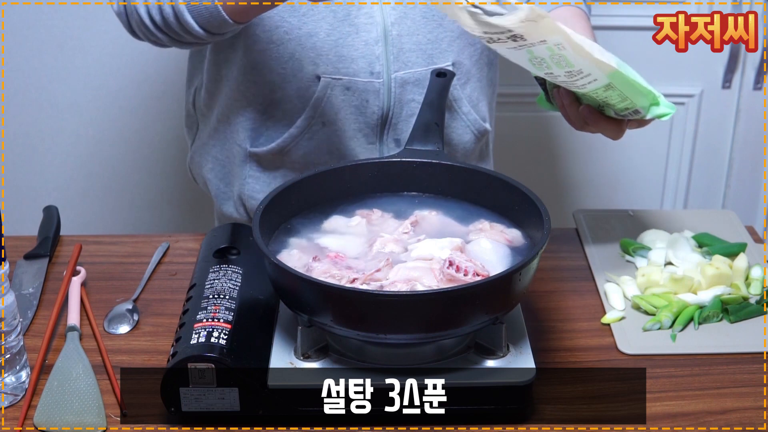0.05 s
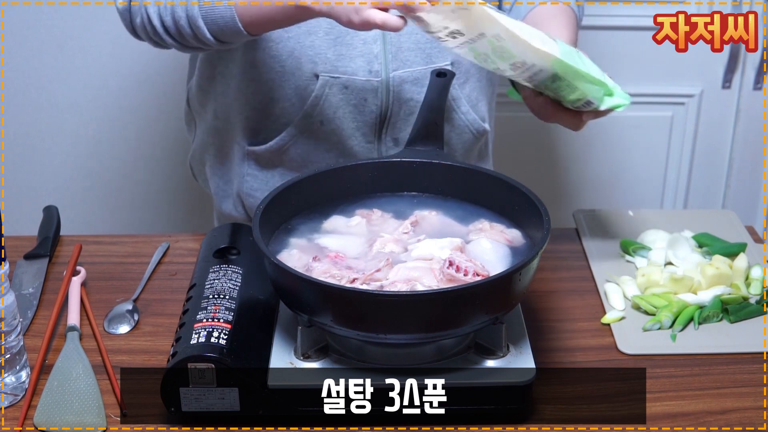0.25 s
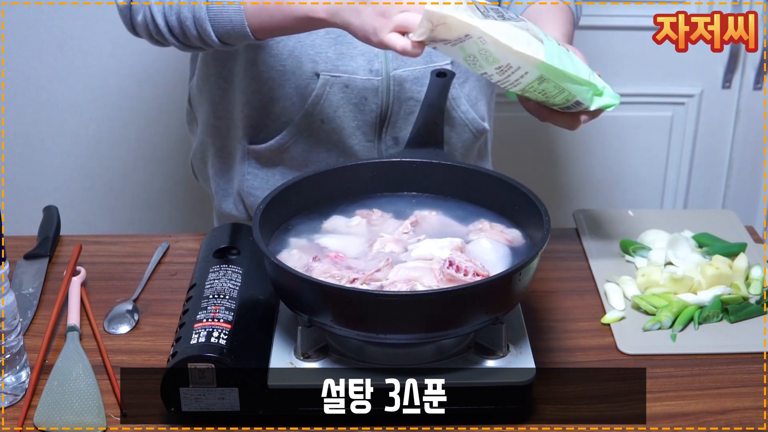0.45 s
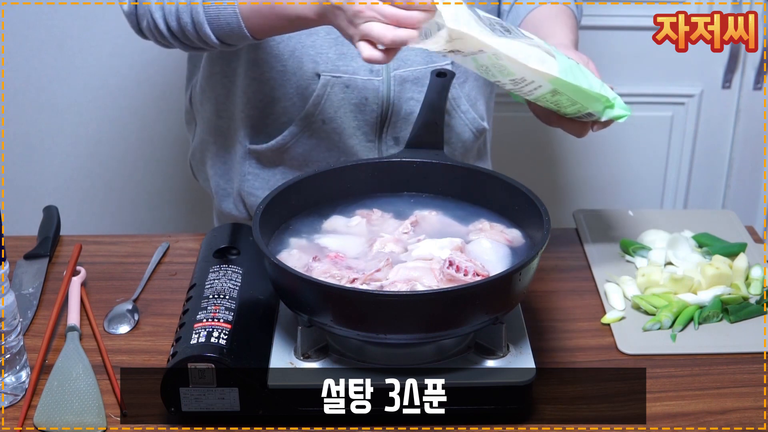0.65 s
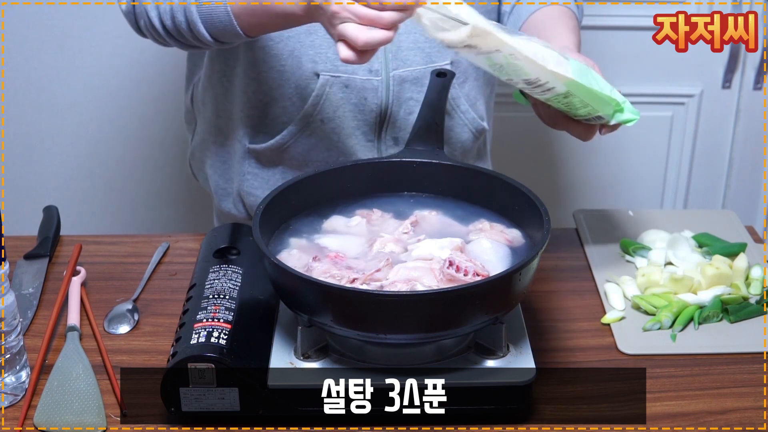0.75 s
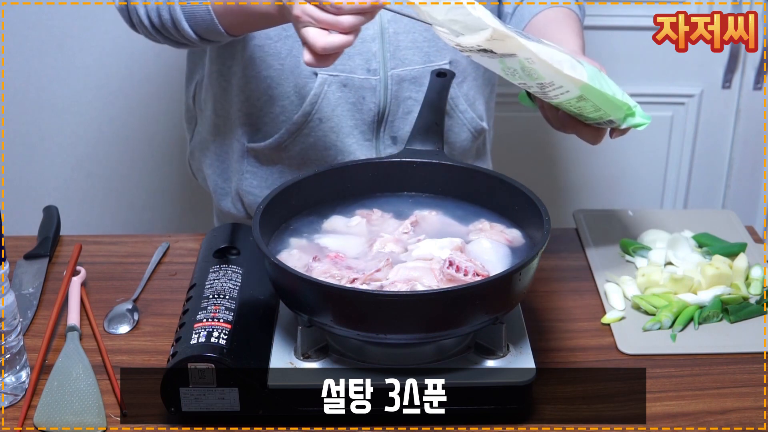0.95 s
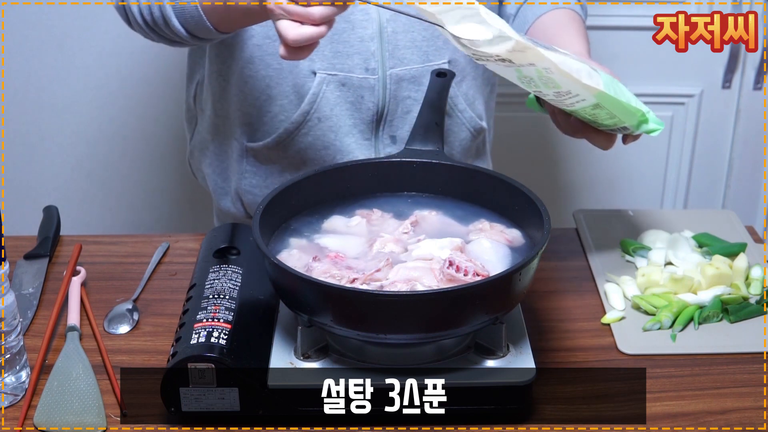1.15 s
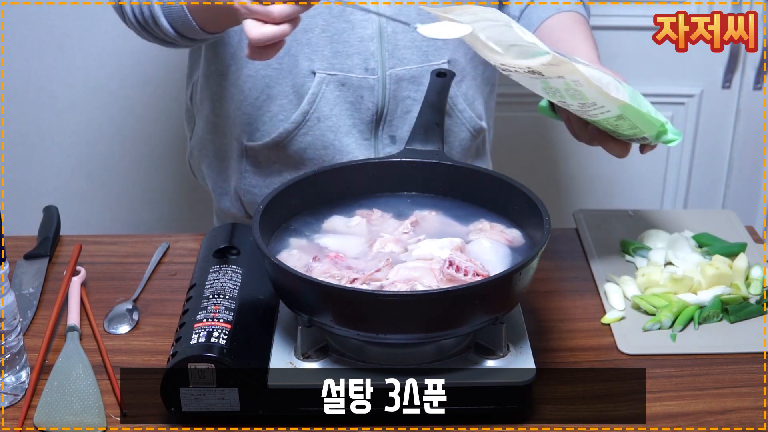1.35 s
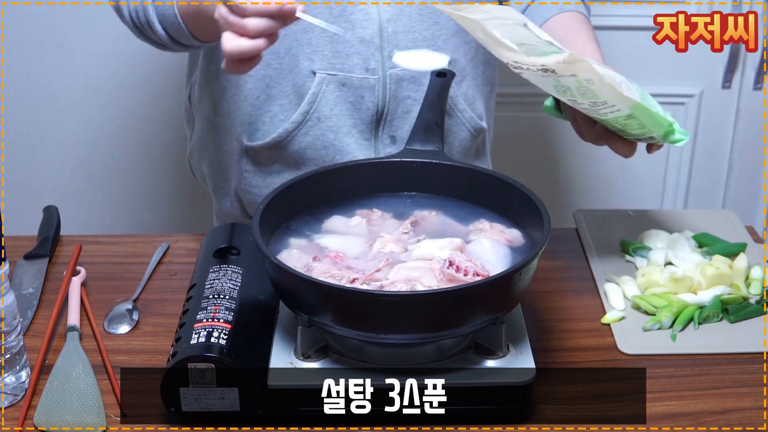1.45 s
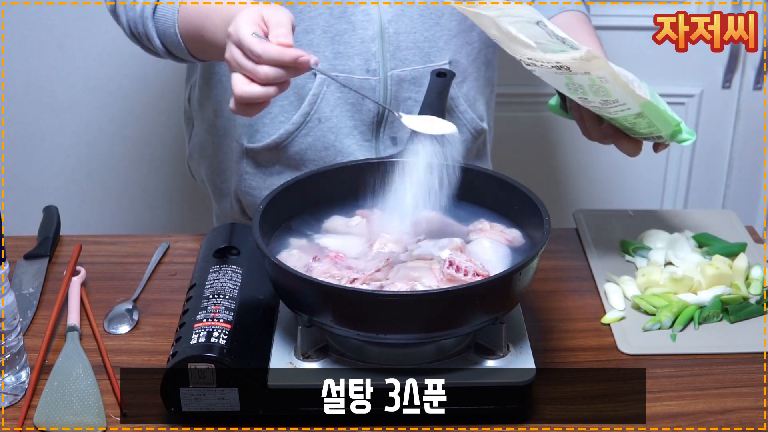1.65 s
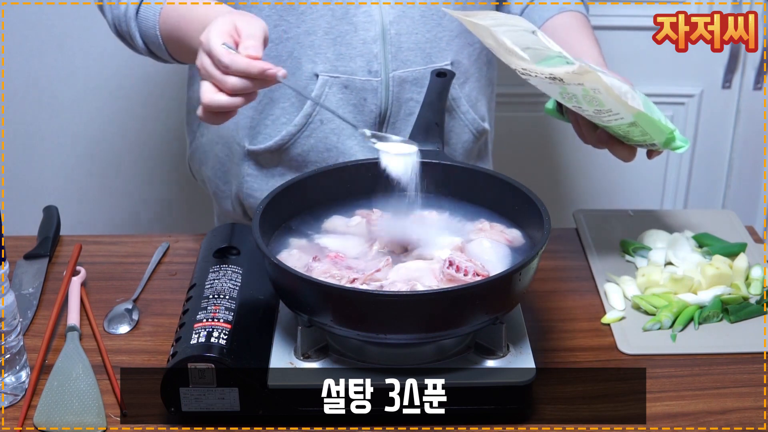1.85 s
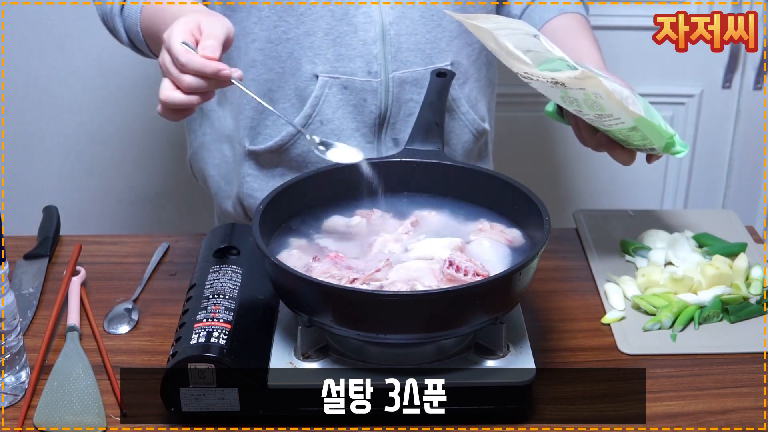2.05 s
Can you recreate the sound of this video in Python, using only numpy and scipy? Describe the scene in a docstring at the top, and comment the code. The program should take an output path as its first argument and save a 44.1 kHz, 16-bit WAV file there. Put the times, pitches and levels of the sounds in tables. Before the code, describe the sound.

A metal spoon scoops crunching sugar from a crinkling plastic bag in a small kitchen.

```python
"""A metal spoon digs into a plastic bag of sugar in a small kitchen.
The stiff film buckles with dull pops and its creases snap. The crystals hiss and crunch in many
tiny slips as the spoon rubs along the bag, then settle; the bag pops twice more as the spoon leaves.
Under it are mains hum and the faint hiss and whistle of a gas burner under a pan."""
import sys
import numpy as np
from scipy import signal
from scipy.fft import rfft, irfft
from scipy.io import wavfile
from scipy.ndimage import uniform_filter1d

SR = 44100
rng = np.random.default_rng(int(sys.argv[2]) if len(sys.argv) > 2 else 0)


def pcm_store(signal):
    """Save signal as 16-bit PCM."""
    levels = np.round(np.clip(np.atleast_2d(signal), -1, 1) * 32767)
    wavfile.write(sys.argv[1], SR, levels.astype(np.int16).T)


N = 92610
TIME, FREQ = np.arange(N) / SR, np.fft.rfftfreq(2 * N, 1 / SR)

# how alike the background is in both ears (frequency [Hz], likeness [0-1])
BACKGROUND_LIKENESS = [(30, 0.698), (300, 0.61), (1000, 0.914), (2500, 0.48), (6000, 0.55), (16000, 0.27)]


def amp(db):
    """Turns decibels into a gain."""
    return 10 ** (np.asarray(db) / 20)


def unit(x):
    """Scales a signal to an average power of 1."""
    return x / np.sqrt(np.mean(x ** 2) + 1e-20)


def read(points, hz=FREQ):
    """Reads between a table's points on a log-frequency axis."""
    f, value = np.transpose(points)
    return np.interp(np.log(hz + 1), np.log(f + 1), value)


def level(points):
    """Turns a decibel curve into a gain over time."""
    return amp(np.interp(TIME, *np.transpose(points)))


def add(mix, start_s, sound):
    """Mixes a sound in at its start time."""
    part = mix[max(round(start_s * SR), 0):][:len(sound)]
    part += sound[:len(part)]


def shape(x, gain):
    """Filters a signal with one gain per frequency."""
    return irfft(rfft(x, 2 * N) * gain)[..., :N]


def click(spectrum, treble_hz=SR, bass_hz=1, panel_hz=1, size=2048):
    """A click of energy 1 with this tone colour, a broad peak at panel_hz, and bass and treble cuts."""
    hz = np.fft.rfftfreq(size, 1 / SR) + 1
    peak_db = 5.5 * np.exp(-(np.log2(hz / panel_hz) / 0.369) ** 2)
    cuts = np.sqrt((1 + (hz / treble_hz) ** 3.5) * (1 + (bass_hz / hz) ** 4))
    gain = amp(read(spectrum, hz) + peak_db) / cuts
    log_gain = np.log(np.r_[gain, gain[-2:0:-1]] + 1e-6)
    # minimum phase: the energy comes right at the start
    taps = np.fft.ifft(np.exp(np.conj(signal.hilbert(log_gain)))).real[:size // 2]
    return taps / np.linalg.norm(taps)


def stereo(x, likeness):
    """Blends two unrelated signals into left and right of the given likeness."""
    same = np.clip(read(likeness), 0, 1)
    mid = shape(x[0], np.sqrt((1 + same) / 2))
    side = shape(x[1], np.sqrt((1 - same) / 2))
    return np.array([mid + side, mid - side])


def burst(envelope, passes=3):
    """Random crackle with the envelope's energy; each pass evens out its spectrum."""
    x = envelope * rng.standard_normal(SR)[:len(envelope)]
    for _ in range(passes):
        z = rfft(x)
        x = irfft(z / (abs(z) + 1e-12), len(x)) * (envelope / envelope.max()) ** .3
    return x * np.linalg.norm(envelope) / np.linalg.norm(x)


def kitchen(x, echo_db, gap_s=.005):
    """Adds the dense, quickly dying echoes from the walls of a small room."""
    # how long echoes last (frequency [Hz], time to fade by 60 dB [s])
    fade_times = [(100, 0.247), (400, .42), (1000, 0.289), (3000, 0.3406), (8000, 0.393), (16000, 0.412)]
    # how alike they are in both ears (frequency [Hz], likeness [0-1])
    likeness = [(100, 0.93), (500, 0.95), (1200, 0.9445), (2200, 0.849), (4000, 0.62), (8000, 0.214),
                (16000, 0.11)]
    decay = 1000. ** (-TIME / fade_times[1][1])
    noise = rng.standard_normal((2, N))
    for _ in range(6):  # even out tone colour and loudness in turn
        z = rfft(noise * decay)
        noise = irfft(z / (abs(z) + 1e-12), N)
        noise /= np.sqrt(abs(uniform_filter1d(noise ** 2, size=600)) + 1e-30)
    hz, t, bands = signal.stft(noise, SR, nperseg=256)
    fades = 1000. ** (-t / np.maximum(read(fade_times, hz), .02)[:, None])
    tail = stereo(signal.istft(bands * fades, SR)[1][:, :N], likeness)
    delay = np.exp(-2j * np.pi * FREQ * gap_s)
    return x + amp(echo_db) * shape(x, delay * rfft(tail / np.linalg.norm(tail[0]), 2 * N))


def friction(spectrum, loudness, per_s, spread_db, jerk_hz=37.8, jerk_db=5):
    """Many tiny slips of uneven size, in clumps because the spoon moves in small jerks."""
    # how alike the slips are in both ears (frequency [Hz], likeness [0-1])
    likeness = [(100, 1), (1200, 0.983), (2500, 1), (5000, 0.832), (9000, 0.74), (16000, 0.57)]
    jerks = unit(shape(rng.standard_normal(N), np.exp(-np.log2((FREQ + 1) / jerk_hz) ** 2)))
    sizes_db = spread_db * np.minimum(rng.exponential(1, (2, N)), 4) + jerk_db * np.tanh(jerks)
    sizes = amp(sizes_db) * rng.choice([-1, 1], (2, N))
    slips = unit(sizes * (rng.random((2, N)) < per_s / SR)) * level(loudness)
    tick = click(spectrum, bass_hz=229)  # grains and small slips give no bass
    return stereo(shape(slips, rfft(tick, 2 * N)), likeness)


def steady_hiss():
    """The burner and the room give a faint, even noise."""
    # tone colour of the hiss (frequency [Hz], relative level [dB])
    colour = [(20, 1.5), (45, 2.5), (90, -1.5), (170, -1), (300, -6.5), (450, -5), (720, -11), (1200, -6),
              (1500, -14.5), (1800, -8), (2200, -16.5), (5000, -16), (7500, -13.5), (11000, -16.5),
              (16000, -17.5)]
    noise = stereo(rng.standard_normal((2, N)), BACKGROUND_LIKENESS)
    return amp(-50.5) * unit(shape(noise, amp(read(colour))))


def burner_whistles():
    """The gas burner whistles in narrow bands of noise."""
    # the whistles (pitch [Hz], width [Hz], level [dB])
    whistles = [(994.3, 76, -60.5), (1115, 23.8, -68.5), (3518.6, 89, -69.5), (4946, 37, -68.5),
                (7243, 75, -66.5), (8219, 155, -64)]
    # the lowest two waver near the end (time [s], level change [dB])
    swell = [(0, 0.5), (1.55, 0.5), (1.68, 2.5), (1.8, -3.5), (1.86, 8), (2.02, -1.5), (2.1, 3)]
    out = np.zeros((2, N))
    for k, (hz, width, db) in enumerate(whistles):
        noise = stereo(rng.standard_normal((2, N)), BACKGROUND_LIKENESS)
        band = shape(noise, 1 / (1 + (2 * (FREQ - hz) / width) ** 2))
        out += amp(db) * unit(band) * (level(swell) if k < 2 else 1)
    return out


def mains_hum(hz=60.55):
    """Mains power hums on one low tone."""
    return amp(-53.5) * unit(np.sin(2 * np.pi * hz * TIME))


def sugar_slide():
    """Crystals slide along the spoon and the film, so many that they blur into a hiss."""
    # tone colour of a grain (frequency [Hz], relative level [dB])
    colour = [(100, -17.5), (600, 1), (1500, 0.5), (2500, -3), (4500, -0.5), (6800, 2), (9000, 0),
              (11000, -4), (13500, -6.5), (16000, -18)]
    # loudness of the sliding (time [s], relative level [dB])
    loudness = [(0, -60), (.05, -63.5), (0.068, -40.5), (.11, -58.5), (.16, -68), (.222, -53), (0.238, -26),
                (.29, -52.5), (0.304, -20.5), (.345, -41.5), (.39, -41.5), (.435, -45), (0.461, -33),
                (0.497, -30), (.515, -23.5), (.565, -48.5), (.68, -38), (.74, -44), (.83, -38.5),
                (0.939, -46.5), (1.0, -41.5), (1.15, -53.5), (1.23, -48), (1.36, -61), (1.6, -61),
                (2.1, -70)]
    return friction(colour, loudness, per_s=7000, spread_db=5.5)


def sugar_crunch():
    """Crystals crunch between the spoon and the film."""
    # tone colour of a crunch (frequency [Hz], relative level [dB])
    colour = [(200, -52), (1200, -6), (2000, -1.5), (2600, -3), (3300, -5.5), (4200, 0.5), (5200, -5.5),
              (7000, -5.5), (16000, -45.5)]
    # loudness of the crunching (time [s], relative level [dB])
    loudness = [(0, -79.5), (.05, -61.5), (.075, -56.5), (.2, -83), (.225, -39), (.255, -26.5),
                (.30, -27.5), (.42, -40.5), (.455, -56), (.52, -43.5), (.575, -35), (.60, -32.5),
                (.65, -37), (.70, -41), (0.779, -53), (.95, -50.5), (.99, -42), (1.05, -64), (1.10, -44),
                (1.159, -76), (1.22, -56), (1.351, -78.5), (2.1, -67.5)]
    return friction(colour, loudness, per_s=850, spread_db=4)


def spoon_rub():
    """The spoon rubs along the wall of the bag in small, dull slips."""
    # tone colour of the wall (frequency [Hz], relative level [dB])
    colour = [(50, -20), (200, -3.5), (380, -1), (600, -4), (800, -1.5), (1300, -0.5), (2000, -11),
              (4000, -25), (16000, -64)]
    # loudness of the rubbing (time [s], relative level [dB])
    loudness = [(0, -55.5), (.05, -77), (.08, -55.5), (0.198, -58.5), (0.248, -24.5), (.34, -34.5),
                (.40, -36), (0.459, -32), (.52, -32), (.57, -44.5), (.63, -30.5), (.72, -38.5),
                (.79, -43.5), (.86, -49), (.94, -48), (1.02, -45), (1.13, -51.5), (1.22, -55.5),
                (1.31, -61), (1.42, -42), (1.53, -66), (2.1, -57)]
    return friction(colour, loudness, per_s=750, spread_db=4.5)


def bag_pops(rise_s=0.0023):
    """One panel of film buckles at a time, with a dull pop that sets the bag ringing."""
    # the pops (time [s], relative level [dB], length [s], treble cut [Hz], bass cut [Hz], pitch [Hz])
    buckles = [(0.226, -21, 0.0079, 1900, 200, 515), (0.23, -21, 0.00324, 2200, 150, 497),
               (.2362, -10.5, 0.00997, 2790, 142, 1384), (0.2504, -11.5, 0.0068, 3570, 150, 1430),
               (.263, -18, 0.0154, 2620, 200, 884), (0.298, -15.5, 0.0025, 1700, 200, 1000),
               (0.309, -15.5, 0.0074, 1720, 303, 1116), (0.33, -19, 0.0118, 1940, 305, 1134),
               (0.415, -21.5, 0.0072, 2200, 397, 1350), (0.4439, -20, 0.0054, 1520, 484, 710),
               (0.485, -35, 0.004, 1400, 406, 1080), (0.506, -25, 0.00817, 1500, 386, 1156),
               (0.53, -30, 0.0069, 1500, 400, 1183), (0.58, -23.5, 0.00436, 1870, 359, 1084),
               (0.5856, -16.5, 0.00507, 1820, 345, 1204), (0.593, -22.5, 0.00706, 2500, 199, 1320),
               (0.61, -26.5, 0.0065, 2150, 696, 1170), (0.648, -22.5, 0.0034, 1500, 750, 1130),
               (0.6846, -15.5, 0.00625, 1260, 467, 1057), (0.716, -22, 0.00318, 1200, 388, 816),
               (0.756, -28.5, 0.0085, 1210, 505, 830), (0.8, -27.5, 0.0047, 1180, 445, 813),
               (0.864, -26.5, 0.005, 1200, 504, 825), (0.976, -28.5, 0.00344, 1014, 250, 730),
               (0.9811, -30.5, 0.0154, 1110, 163, 684), (1.353, -41, 0.0103, 450, 262, 362),
               (1.3838, -30.5, 0.0078, 1705, 130, 594), (1.393, -35.5, 0.00786, 1600, 140, 1250),
               (1.438, -53.5, 0.0026, 1400, 200, 1180)]
    # tone colour of a pop (frequency [Hz], relative level [dB])
    colour = [(40, -21.5), (120, 2.5), (200, -10.5), (300, -2), (520, -2.5), (700, 2), (1050, 0.5),
              (1400, 0), (1900, -2.5), (2600, -1), (3500, -7), (8000, -0.5), (16000, -20.5)]
    # ringing of the bag and nearby air (pitch [Hz], relative level [dB], time to fade by 60 dB [s])
    tones = [(317.7, 6.5, 0.59), (469.5, -2, 0.233), (669, 8.5, 0.164), (792, -10.5, 0.156),
             (919.7, 5, 0.18), (995.3, -10, 0.52), (1037, 1.5, 0.596), (1231, -4, 0.59), (1377, -4, 0.45),
             (1337, 6, 0.31), (1463, -23, 0.33), (1476, -2, 0.474), (1712, 2, 0.335)]
    pops, t = np.zeros(N), np.arange(4096) / SR
    for start_s, db, length, treble_hz, bass_hz, panel_hz in buckles:
        envelope = np.minimum(t / rise_s, 1) * np.exp(-(t / length) ** 1.386 / 2)
        crumple = signal.fftconvolve(burst(envelope), click(colour, treble_hz, bass_hz, panel_hz))
        rounded = np.tanh(crumple * 0.65)  # softens the peaks
        add(pops, start_s, amp(db) * rounded * np.linalg.norm(envelope) / np.linalg.norm(rounded))
    ring = sum(amp(db) * 1000. ** (-TIME / fade_s) * np.cos(2 * np.pi * hz * TIME)
               for hz, db, fade_s in tones)
    return kitchen(pops, echo_db=0) + amp(-58) * shape(pops, rfft(ring, 2 * N))


def crease_snaps(slip_count=4, slip_s=.00035):
    """A crease gives way in a few sharp slips within some milliseconds."""
    # the snaps (time [s], relative level [dB], length [s], treble cut [Hz])
    snaps = [(0.235, -24, 0.0029, 10000), (0.25, -17.5, .004, 4900), (0.2954, -16.5, 0.00453, 13300),
             (0.363, -40, 0.0033, 11000), (0.4441, -18.5, 0.00248, 9150), (0.519, -32.5, 0.0031, 11000),
             (0.521, -27.5, 0.00335, 7000), (0.5856, -26, 0.0044, 5200), (.622, -28, 0.00336, 6000),
             (0.9815, -37.5, 0.0046, 8100), (1.383, -40.5, 0.0023, 3300)]
    # tone colour of a snap (frequency [Hz], relative level [dB])
    colour = [(100, -13.5), (500, -1.5), (1200, 4.5), (3000, 5.5), (5000, 2), (8000, 4), (11000, -3),
              (16000, -11.5)]
    out, t = np.zeros(N), np.arange(1024) / SR
    for start_s, db, length, treble_hz in snaps:
        slip_times = (np.arange(slip_count) + .5 * rng.random(slip_count)) * length / slip_count
        envelope = sum((t >= at) * np.exp(-abs(t - at) / slip_s) for at in slip_times)
        crack = burst(envelope, passes=0) / np.linalg.norm(envelope) * np.sqrt(length * SR)
        tick = click(colour, treble_hz, bass_hz=380)  # a crease is too small to make bass
        add(out, start_s, amp(db) * signal.fftconvolve(crack, tick))
    return kitchen(out, echo_db=0.5)


def scene():
    """The bag and the sugar over the quiet kitchen."""
    bag = amp(-4.5) * bag_pops() + crease_snaps()
    scoop = amp(-5) * kitchen(sugar_slide() + sugar_crunch() + spoon_rub(), echo_db=2.5)
    return bag + scoop + steady_hiss() + burner_whistles() + mains_hum()


def record(dry):
    """Cuts the highest treble, above 15780 Hz."""
    low_pass = signal.firwin(511, 15780, window=("kaiser", 9), fs=SR)
    return signal.oaconvolve(dry, low_pass[None], "same")


dry = scene()
out = record(dry)
pcm_store(out)
```